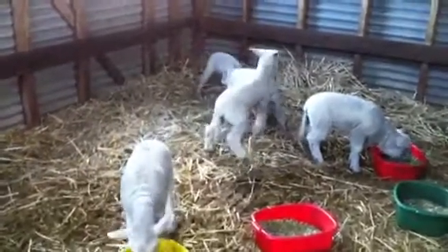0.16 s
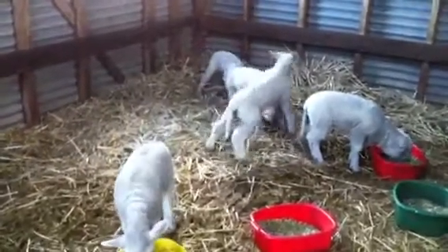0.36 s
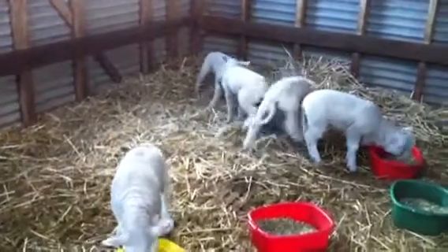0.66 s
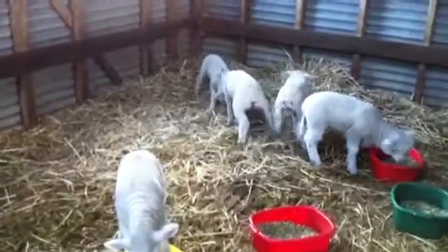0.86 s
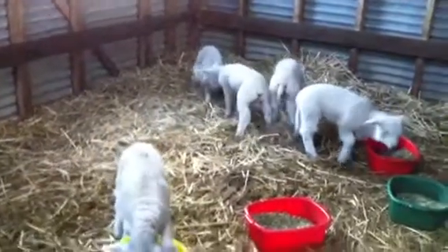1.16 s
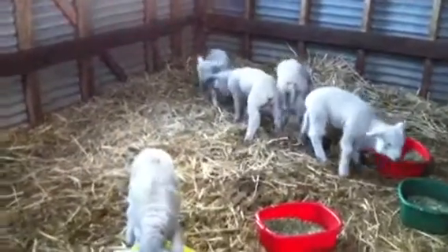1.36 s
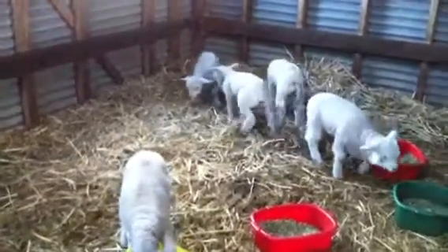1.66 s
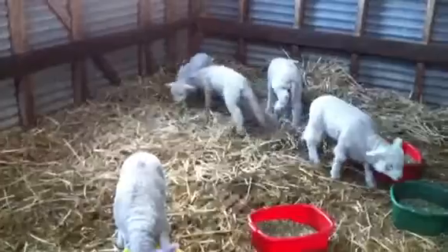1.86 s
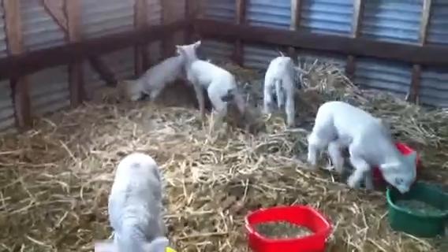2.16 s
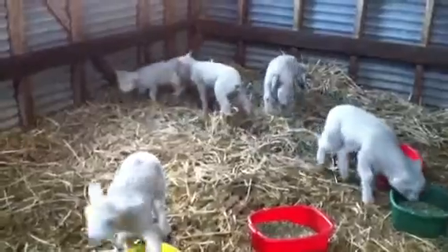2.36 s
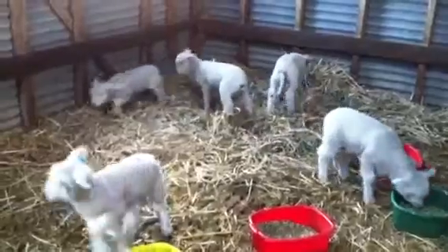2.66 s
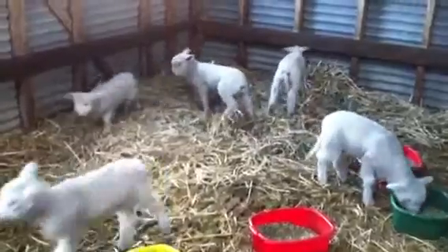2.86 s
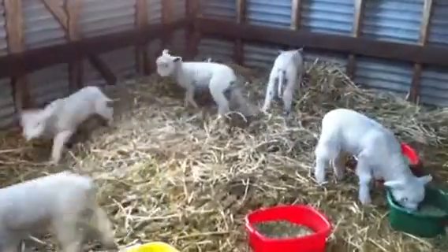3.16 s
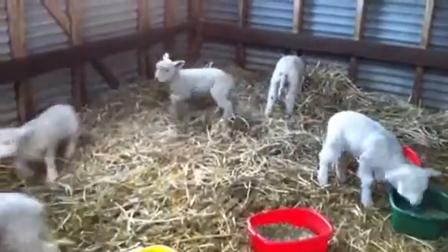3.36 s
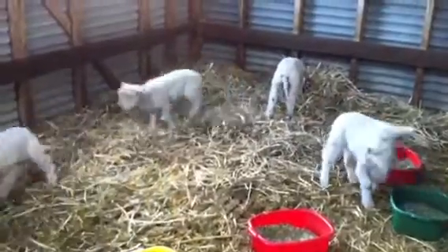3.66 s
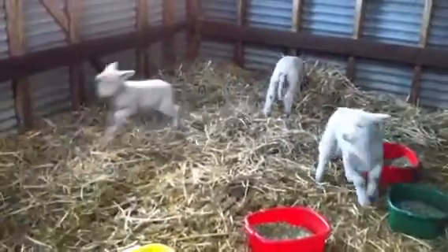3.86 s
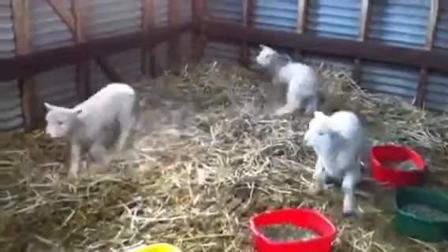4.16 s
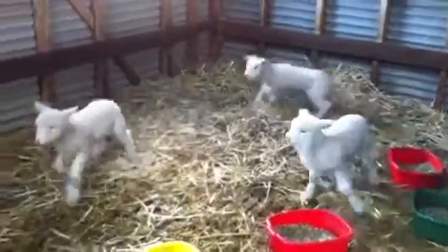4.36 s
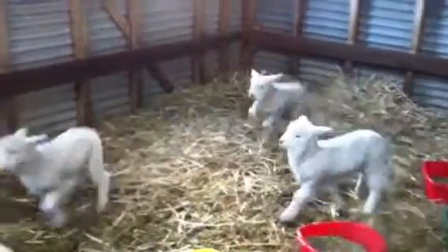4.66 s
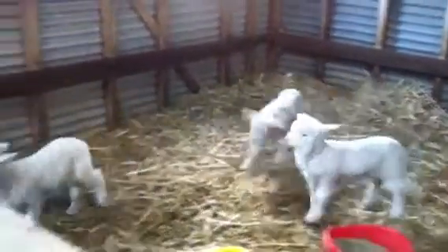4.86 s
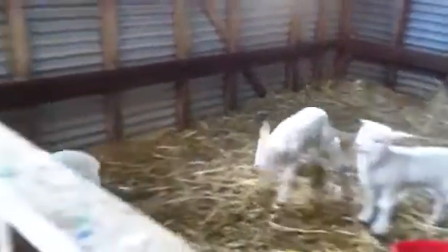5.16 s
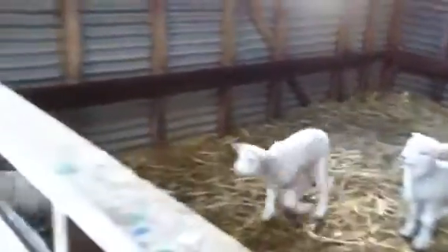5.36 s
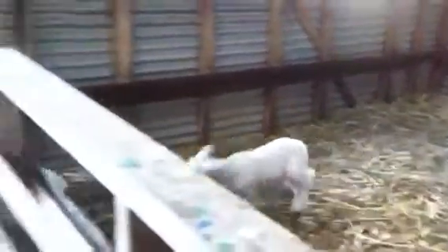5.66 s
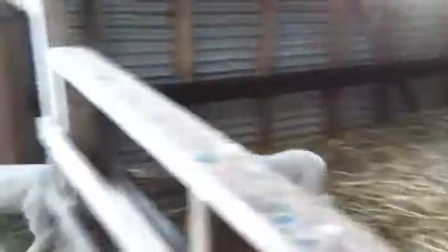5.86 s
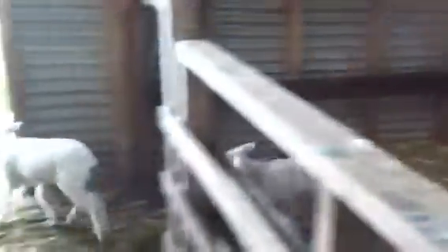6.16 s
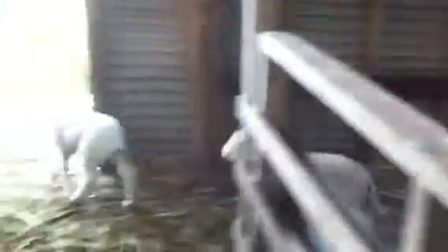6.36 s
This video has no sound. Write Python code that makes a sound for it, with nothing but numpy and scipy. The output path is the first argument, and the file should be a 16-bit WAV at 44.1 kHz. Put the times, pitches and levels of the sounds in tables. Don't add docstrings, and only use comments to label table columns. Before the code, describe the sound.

A quiet shed with soft hiss and a faint low draught on a small, nearly mono microphone. From 0 to 1 s, lambs stir dry straw: short crisp drags, light steps and tiny stalk snaps. At about 1.2 s a firm hoof thump lands with a dull woody knock and small rattle; softer steps follow at 1.35 and 1.65 s. Around 2.0-2.3 s the rustling swells brightly. At 2.6-2.75 s comes the sharpest clatter, a hard hollow knock on board or tub with a bouncing thud. From 3 to 4.8 s straw crackles almost continuously with few light steps. Firm thuds hit near 4.95 and 5.14 s amid strong rustles, then knocks and rattles at 5.4-5.6 s. Movement thins after 5.8 s; a very faint, hoarse distant bleat lasts from about 5.87 to 6.08 s. Sparse ticks and soft steps fade into quiet air by 6.5 s.

```python
import sys
import numpy as np
from scipy import signal
from scipy.fft import rfft, irfft
from scipy.io import wavfile
from scipy.ndimage import uniform_filter1d

SR = 44100
rng = np.random.default_rng(int(sys.argv[2]) if len(sys.argv) > 2 else 0)


def waveform_to_disk(signal):
    frames = np.transpose(np.atleast_2d(signal))
    scaled = np.clip(frames, -1, 1) * 32767
    samples = np.round(scaled).astype(np.int16)
    wavfile.write(sys.argv[1], SR, samples)


def voltage_ratio(level):
    return 10 ** (np.asarray(level, float) / 20)


N = 287958


# freq_hz, density_db
FINE_SPECTRUM = [(1470, -9.5), (2500, -5), (6300, 0), (9000, 1.5), (12000, 5), (14000, 2), (16000, -3)]
# freq_hz, density_db
COARSE_SPECTRUM = [(300, -4), (700, -2), (1200, 1), (2000, 1.5), (3200, -1.5), (4500, -1), (7000, -11.5)]


def straw():
    fine_db, coarse_db = stir()
    fine = evened(colour(snaps(per_s=14000, spread_db=1.5), FINE_SPECTRUM))
    coarse = evened(colour(snaps(per_s=5000, spread_db=3.0), COARSE_SPECTRUM))
    clumps_db = 0.68 * lumps(count=400) + 0.5 * lumps(count=1600)
    coarse_gain = voltage_ratio(coarse_db - 1.0 + 1.76 * lumps(count=1500))
    return voltage_ratio(fine_db + clumps_db) * (fine + coarse_gain * coarse)


# time_s, crackle_db, thick_stalks_db (against the crackle)
SHUFFLE = [(0.0, -59.5, -13), (0.4, -61, -12), (0.8, -56, -16.5), (1.27, -57, -13), (1.45, -54, -26),
           (1.69, -52, -17), (2.05, -44, -17.5), (2.46, -45.5, -11.5), (2.81, -51.5, -12),
           (3.2, -49, -14.5), (3.7, -47, -15.5), (4.2, -45.5, -13), (4.66, -44.5, -14),
           (4.92, -47.5, -16.5), (5.3, -48, -13), (5.78, -52.5, -4), (5.85, -58, -6.5), (6.53, -62.5, -11)]
# height_s, crackle_db, half_length_s
DRAGS = [(0.226, -45, 0.072), (.35, -52, 0.041), (0.468, -51, 0.042), (0.608, -45, 0.094),
         (0.724, -44, 0.047), (0.887, -44, 0.091), (1.082, -43.5, 0.17), (1.447, -47, 0.071),
         (1.618, -48.5, 0.012), (1.856, -48, 0.053), (2.252, -39.5, 0.15), (2.662, -42.5, 0.13),
         (2.903, -46.5, 0.11), (3.01, -48, 0.095), (3.152, -43.5, 0.065), (3.253, -45, 0.019),
         (3.378, -44.5, 0.17), (3.618, -43, 0.053), (3.74, -44, 0.029), (3.866, -43, 0.079),
         (4.145, -45, 0.075), (4.29, -44, 0.028), (4.42, -41.5, 0.21), (4.81, -39.5, 0.062),
         (4.987, -44.5, 0.046), (5.15, -39.5, 0.051), (5.364, -51, 0.035), (5.547, -51, 0.026),
         (5.893, -52.5, 0.016), (6.054, -54, 0.043),
         (.14, -61, .03), (0.454, -50, .02), (0.603, -48, .02), (.92, -47, 0.029), (1.066, -49, .02),
          (1.36, -51, 0.032), (1.5, -53, .02), (1.585, -60, 0.022), (1.78, -52, .02), (2.126, -44, 0.032),
          (2.264, -42.5, 0.027), (2.59, -45, 0.035), (2.88, -56, .02), (3.145, -50, .02), (3.483, -48, .02),
          (3.973, -43.5, .02), (4.05, -48, .02), (4.593, -44, 0.055), (4.66, -47, .02), (4.788, -46, .02),
          (4.978, -41.5, .02), (5.05, -49, 0.026), (5.202, -45.5, 0.025), (5.542, -48, .005),
          (5.646, -54, .02), (5.97, -55, .02), (6.13, -60, .012), (6.172, -53, .025), (6.328, -57, .025),
          (6.5, -54.5, .04)]


def stir():
    base_db, coarse_db = follow(SHUFFLE)
    fine_db = 10 * np.log10(voltage_ratio(2 * base_db) + swells(DRAGS))
    slow_db = uniform_filter1d(fine_db, size=3000)
    return fine_db, coarse_db + slow_db - fine_db


# height_s, peak_db
BREAKS = [(0.0694, -42), (0.1637, -36), (0.1764, -34), (0.2985, -33), (0.4677, -35), (0.5226, -37),
          (0.7191, -31), (0.7355, -32), (0.8151, -33), (1.0382, -30), (1.0616, -27), (1.3543, -36),
          (1.4755, -32), (1.5396, -37), (1.6115, -34), (1.8082, -33), (2.699, -30), (2.9315, -31),
          (3.0022, -33), (3.1434, -28), (3.2436, -28), (3.5797, -26), (3.8035, -32), (3.9107, -32),
          (4.1045, -30), (4.6406, -30), (4.9661, -29), (5.1067, -31), (5.1766, -27), (5.2785, -32),
          (5.313, -37), (5.5376, -26), (5.6271, -37), (5.7022, -33), (5.7437, -38), (5.8849, -38),
          (6.0656, -39), (6.0782, -39), (6.1325, -42), (6.3912, -43)]


def breaks():
    out = np.zeros(N)
    cycles = 1.25
    for (s, peak_db), hz in zip(BREAKS, rng.uniform(12000, 14000, len(BREAKS))):
        add(out, s - cycles / hz, tap(peak_db - 0.6, hz, cycles))
    return out


def hooves():
    return patter() + landings() + blows() + contacts()


# start_s, peak_db, pitch_hz, t60_s, slips_db (against the peak)
THUDS = [(0.145, -42.5, 196, 0.025, -14), (0.373, -41, 169, 0.027, -6.5), (0.812, -43, 268, 0.027, -11),
         (0.851, -51.5, 197.6, 0.24, -7), (1.188, -55, 159, 0.05, 7), (1.227, -37.5, 154, 0.056, -8),
         (1.344, -42.5, 315, 0.038, -3.5), (1.607, -41, 177, 0.027, -27), (1.656, -45.5, 337, 0.027, -2),
         (2.583, -50.5, 268, 0.091, 0), (2.646, -51, 203, 0.11, 1), (2.69, -33, 325, 0.063, 1.5),
         (2.895, -37, 273, 0.018, -4.5), (3.023, -46, 173, 0.062, -3), (4.77, -56, 182, 0.048, 8.5),
         (4.932, -47.5, 374, 0.029, 5), (4.95, -32, 218, 0.031, -20), (5.139, -34, 194, 0.026, -8),
         (5.38, -52, 330, 0.041, 11), (5.419, -45, 243, 0.034, 6), (5.456, -42, 244, 0.035, 5.5),
         (5.481, -51, 358, 0.031, -19), (5.593, -41.5, 219, 0.1, -9), (6.127, -52, 196, 0.037, 4)]
# start_s, peak_db, pitch_hz
MORE_THUDS = [(0.35, -47, 221), (0.621, -49, 150), (0.656, -47, 186), (0.739, -46, 131), (0.775, -45, 193),
              (1.001, -51, 170), (1.136, -53, 207), (1.258, -44, 394), (1.39, -53, 294), (1.774, -48.5, 206),
              (2.31, -52.5, 258), (2.718, -42, 186), (2.749, -48, 188), (2.927, -42.5, 154), (2.984, -44, 210),
              (3.359, -56, 236), (3.652, -49, 169), (4.17, -51.5, 264), (4.369, -50, 314), (4.49, -56, 198),
              (4.555, -45.5, 236), (4.81, -46.5, 169), (4.999, -50, 250), (5.068, -47, 208), (5.513, -45, 233),
              (5.63, -48, 274), (5.741, -52, 158), (5.984, -46.5, 172), (6.03, -49.5, 172), (6.169, -47, 189)]


def landings():
    out = np.zeros(N)
    for s, *fall in THUDS:
        add(out, s, thud(*fall))
    for s, peak_db, hz in MORE_THUDS:
        add(out, s, thud(peak_db, hz, t60=0.043, slips_db=-9))
    return out


def thud(peak_db, hz, t60, slips_db):
    t = np.arange(SR // 4) / SR
    decay = voltage_ratio(-60 * t / np.clip(t60, 0.02, 0.4))
    push = t * decay * np.sin(2 * np.pi * hz * t * (1 - 0.55 * t))
    mutter = ground(slips(t60=0.16), rng.uniform(0.923, 1.22))
    return peaked(push, peak_db - 0.8) + peaked(mutter, peak_db + slips_db)


# start_s, peak_db, pitch_hz, crack_db (against the peak)
KNOCKS = [(0.0, -57, 1068, 9), (0.029, -57.5, 1150, 7), (0.351, -57, 1170, 8.5), (0.654, -47, 546, -9),
          (0.889, -52, 563, -2), (1.196, -47, 706, -4), (1.227, -33.5, 526, -20), (1.238, -42.5, 497, -26),
          (1.344, -42.5, 552, -6), (1.608, -47, 565, -5), (1.659, -47, 516, -11), (1.988, -50, 480, -7),
          (2.581, -35, 614, -0.5), (2.585, -43, 1330, 3), (2.59, -35.5, 910, -12), (2.609, -38.5, 623, -17),
          (2.69, -36, 520, -8), (2.966, -45.5, 1210, -15), (2.98, -46, 555, -11), (4.373, -45, 960, -7),
          (4.478, -42.5, 543, -5), (4.932, -40.5, 423, -10), (5.136, -48.5, 430, 7.5),
          (5.383, -35, 473, -11), (5.399, -35, 775, -11), (5.453, -50, 463, -17), (5.584, -49, 1193, 0),
          (5.64, -54, 815, -5), (5.672, -53, 418, -5), (6.25, -56.5, 610, 3)]
# start_s, peak_db, pitch_hz
NUDGES = [(0.449, -47.5, 654), (0.854, -49, 785), (1.269, -50, 423), (1.309, -51, 553), (1.389, -46, 497),
          (1.945, -50, 480), (2.161, -43.5, 493), (2.198, -54, 563), (2.34, -47, 623), (2.645, -43, 850),
          (2.719, -47, 700), (2.821, -46.5, 536), (2.892, -53, 516), (2.925, -51, 590), (3.657, -50, 553),
          (4.509, -48, 596), (4.767, -50, 654), (4.939, -45, 710), (5.198, -52, 730), (5.328, -48, 655),
          (5.389, -50, 1350), (5.419, -47, 573), (5.439, -43, 470), (5.46, -50, 1050), (5.478, -61, 416),
          (5.5, -51, 795), (5.605, -45.5, 700), (5.63, -49, 880), (6.074, -51.5, 755), (6.198, -48.5, 730)]


def blows():
    out = np.zeros(N)
    for s, peak_db, hz, crack_db in KNOCKS:
        add(out, s, knock(peak_db, hz, crack_db, t60=0.13))
    for s, peak_db, hz in NUDGES:
        add(out, s, knock(peak_db, hz, crack_db=-11, t60=0.18))
    return out


# freq_hz, width_hz, gain_db
BOARD_MODES = [(403, 160, -4), (589, 47, 13), (610, 200, 7), (740, 170, -6), (820, 61, -7)]
# freq_hz, width_hz, gain_db
TUB_MODES = [(1050, 240, 8), (1330, 240, 8.5), (1610, 460, 3.5), (2100, 380, 5), (2840, 1400, -1.5)]


def knock(peak_db, hz, crack_db, t60):
    blow = slips(t60)
    blow[60] += 9.5
    board = ring(blow, hz, 100) + 0.53 * body(blow, BOARD_MODES, rng.uniform(0.704, 1.162))
    board = ring(board, hz, 1000)
    crack = ring(body(slips(1.53 * t60), TUB_MODES), 1630, 1900)
    return peaked(board, peak_db + 0.5) + peaked(crack, peak_db + crack_db - 0.5)


# height_s, peak_db, pitch_hz
BOUNCES = [(0.687, -56, 220), (0.712, -49, 180), (0.779, -54, 298), (0.79, -55, 220), (0.865, -47, 190),
           (0.874, -49, 330), (0.935, -55, 193), (1.218, -57, 180), (1.262, -54, 200), (1.236, -36, 336),
           (1.358, -45, 322), (2.655, -48, 198), (2.696, -45, 328), (2.702, -46, 370), (2.713, -42, 368),
           (2.74, -45, 219), (2.751, -40, 181), (2.76, -49, 370), (2.784, -54, 330), (2.822, -53, 370),
           (2.836, -54, 370), (2.971, -51, 256), (4.36, -54, 370), (4.435, -59, 250), (4.535, -51, 220),
           (4.934, -40, 367), (4.976, -41, 238), (4.834, -51, 370), (5.004, -52, 220), (5.023, -50, 220),
           (5.077, -56, 220), (5.139, -40, 380), (5.153, -56, 370), (5.166, -49, 180), (5.18, -43.5, 171),
           (5.192, -48, 323), (5.457, -50, 270), (5.484, -40, 370), (5.583, -48, 272), (5.605, -54, 200),
           (5.624, -52, 248), (5.63, -47, 370), (5.649, -53, 270), (5.675, -51, 338), (5.747, -54, 173),
           (5.755, -46.5, 222), (6.169, -50, 272), (6.2, -53, 334), (6.213, -48.5, 340)]
# height_s, peak_db, pitch_hz
RATTLES = [(0.364, -53, 1100), (1.242, -57, 610), (1.255, -48, 450), (1.276, -54, 670), (1.292, -54, 744),
           (1.362, -50, 570), (1.614, -49, 1000), (1.967, -54, 1090), (2.134, -51, 1110),
           (2.141, -51, 1230), (2.177, -57, 610), (2.185, -52, 1230), (2.197, -56, 1230), (2.2, -47, 610),
           (2.288, -59, 1360), (2.42, -53, 1010), (2.61, -47, 1230), (2.626, -47, 820), (2.647, -48, 1020),
           (2.661, -47, 820), (2.678, -48, 1230), (2.703, -43, 560), (2.719, -49, 610), (2.73, -48, 610),
           (2.74, -51, 670), (2.853, -50, 725), (2.902, -56, 910), (2.926, -49, 680), (2.966, -47, 1350),
           (2.983, -48, 610), (4.29, -55, 1230), (4.307, -57, 1110), (4.328, -51, 1010), (4.375, -52, 905),
           (4.501, -47, 610), (4.504, -54, 1360), (4.518, -48, 610), (4.769, -51, 1360), (4.769, -48, 820),
           (4.958, -54, 550), (4.988, -55, 490), (5.002, -59, 1360), (5.007, -54, 550), (5.148, -47, 1360),
           (5.164, -51, 820), (5.17, -50, 1230), (5.218, -46, 730), (5.527, -48, 420), (5.39, -42, 428),
           (5.426, -43, 820), (5.433, -50, 550), (5.463, -48, 1010), (5.466, -48, 494), (5.481, -44, 725),
           (5.495, -54, 560), (5.618, -51, 744), (5.648, -55, 1010), (5.763, -55, 1110),
           (1.232, -52, 1900), (1.234, -51, 850), (1.311, -52, 420), (1.332, -54, 570), (2.583, -42, 3300),
          (2.588, -31.5, 1330), (2.594, -41, 2500), (2.595, -36, 960), (2.6, -44, 3600), (2.692, -39, 2100),
          (2.692, -47, 2900), (2.695, -45, 710), (2.709, -46, 457), (2.712, -45, 700), (2.728, -53, 800),
          (2.653, -45, 890), (1.285, -48, 520), (1.296, -55, 430), (5.476, -51, 478), (5.385, -45, 1050),
          (5.395, -46, 1900), (5.399, -47, 2900), (5.407, -47, 2200), (5.417, -49, 1800),
          (5.435, -48, 1200), (5.445, -49, 1500), (5.588, -52, 990), (5.6, -54, 1300), (5.61, -56, 940),
          (5.625, -54, 1197), (5.635, -56, 1600), (5.655, -52, 1300), (5.675, -57, 950)]


def contacts():
    out = np.zeros(N)
    for rows, cycles in (BOUNCES, 1.076), (RATTLES, 1.803):
        for s, peak_db, hz in rows:
            add(out, s - cycles / hz, tap(peak_db, hz, cycles))
    return out


# time_s, level_db
PATTER = [(0.15, -66), (0.62, -58.5), (0.9, -56), (0.97, -66), (1.27, -52), (1.44, -91), (2.07, -70),
          (2.25, -54.5), (2.7, -75), (2.85, -60), (3.47, -60.5), (4.16, -74), (4.29, -55.5), (4.49, -54),
          (5.44, -55), (5.58, -48.5), (5.8, -57), (6.53, -56)]


def patter():
    level_db, = follow(PATTER)
    pushes = ground(snaps(per_s=600, spread_db=4.5))
    return voltage_ratio(level_db - 4.5) * evened(ring(pushes, 290, 500))


# freq_hz, width_hz, gain_db
GROUND_MODES = [(121, 41, -5.5), (155.3, 45, 3), (212, 44, 2), (252, 38, 0.5), (326, 74, -3.5),
                (553, 133, -9.5)]


def ground(x, detune=1):
    return body(x, GROUND_MODES, detune)


# time_s, level_db, fold_rate_hz
CRY = [
    (5.86, -82, 157),
    (5.89, -62.5, 155.5),
    (5.93, -64.5, 153.5),
    (5.97, -71, 154),
    (6.0, -66.5, 165),
    (6.04, -70, 158.5),
    (6.08, -77, 164),
]


def cry():
    level_db, fold_hz = follow(CRY)
    turns = np.cumsum(fold_hz * (1 + 0.006 * lumps(count=350))) / SR
    harmonics = [(12, -8), (13, 0), (14, -13)]  # number, dB
    folds = sum(voltage_ratio(db) * np.cos(2 * np.pi * k * turns) for k, db in harmonics)
    breath = ring(ring(rng.standard_normal(N), 2030, 300), 2030, 300)
    t = np.arange(N) / SR
    sounding = (t > CRY[0][0]) * (t < CRY[-1][0])
    return voltage_ratio(level_db) * evened(folds + 1.5 * breath) * sounding


# freq_hz, t60_s
SHED_DECAY = [(150, 0.33), (500, 0.44), (2000, 0.12), (8000, 0.032), (16000, 0.22)]


def shed(x):
    hz, t, z = signal.stft(rng.standard_normal((3, SR // 3)), SR, nperseg=256)
    decay = voltage_ratio(-60 * t / read(SHED_DECAY, hz)[:, None])
    tails = signal.istft(z * decay, SR, nperseg=256)[1]
    tails[:, :300] = 0
    phase = 2 * np.pi * (np.arange(3)[:, None] / 3 + 2.3 * np.arange(N) / SR)
    shares = np.cos(phase) * np.sqrt(2 / 3)
    tails = tails / np.linalg.norm(tails[0])
    return signal.fftconvolve(x * shares, tails, axes=1)[:, :N].sum(0)


# height_s, level_db
GUSTS = [(.44, -74), (.63, -62), (.85, -67), (1.05, -77), (1.24, -67.5), (1.64, -68), (1.92, -78),
         (2.17, -71), (2.7, -84), (3.6, -71), (3.8, -76), (4.1, -81), (4.46, -73), (4.8, -72), (4.95, -63),
         (5.13, -74), (5.381, -72), (5.56, -63), (5.8, -72), (6.1, -74), (6.4, -81)]


def draught():
    idle_db, half_length_s = -80.5, 0.1
    level = np.sqrt(voltage_ratio(2 * idle_db) + swells([(s, db, half_length_s) for s, db in GUSTS]))
    return level * evened(ring(ring(rng.standard_normal(N), 100, 55), 100, 55))


# freq_hz, density_db
AIR_SPECTRUM = [(12, -6), (22, -7.5), (42, -25), (75, -26), (125, -1), (200, 3), (385, -9.5), (670, -5.5),
                (1300, -8.5), (2400, -9.5), (7000, -8), (11900, -3.5), (14000, -8.5), (16000, -8)]


def quiet_air():
    return voltage_ratio(-54) * evened(colour(rng.standard_normal(N), AIR_SPECTRUM))


def snaps(per_s, spread_db):
    chance, size, sign = rng.random(N), rng.exponential(1, N), rng.choice([-1., 1.], N)
    return (chance < per_s / SR) * sign * voltage_ratio(spread_db * np.minimum(size, 4))


def slips(t60):
    t = np.arange(SR // 4) / SR
    rise = np.minimum(t / 0.00093, 1)
    return rng.standard_normal(len(t)) * voltage_ratio(-60 * t / np.clip(t60, 0.02, 0.6)) * rise


def tap(peak_db, hz, cycles):
    turns = np.arange(round(8 * cycles * SR / hz)) * hz / SR
    swell = turns / cycles * np.exp(1 - turns / cycles)
    return voltage_ratio(peak_db) * swell * np.sin(2 * np.pi * turns)


def ring(x, hz, width):
    r = np.exp(-np.pi * width / SR)
    return 2 * signal.lfilter([1 - r], [1, -r * np.exp(2j * np.pi * hz / SR)], x + 0j).real


def body(x, modes, detune=1):
    return sum((-1) ** k * voltage_ratio(db) * ring(x, hz * detune, width) for k, (hz, width, db) in enumerate(modes))


def swells(rows):
    t = np.arange(0, N + 64, 64) / SR
    fall_db = 7.5
    power = sum(voltage_ratio(2 * (db - fall_db * ((t - s) / half) ** 2)) for s, db, half in rows)
    return np.interp(np.arange(N) / SR, t, power)


def lumps(count):
    return evened(uniform_filter1d(uniform_filter1d(rng.standard_normal(N), count), count))


def colour(x, points):
    return irfft(rfft(x) * voltage_ratio(read(points, np.fft.rfftfreq(len(x), 1 / SR))), len(x))


def read(points, hz):
    f, value = np.transpose(points)
    return np.interp(np.log(hz + 1), np.log(f + 1), value)


def follow(rows):
    s, *columns = np.transpose(rows)
    return [np.interp(np.arange(N) / SR, s, c) for c in columns]


def evened(x):
    return x / np.sqrt(np.mean(x ** 2) + 1e-20)


def peaked(x, db):
    return voltage_ratio(db) * x / abs(x).max()


def add(mix, s, sound):
    part = mix[round(s * SR):][:len(sound)]
    part += sound[:len(part)]


def scene():
    steps, rustle = hooves(), straw() + breaks()
    near = steps + rustle + cry() + shed(voltage_ratio(-13.5) * (steps + rustle))
    no_bass = signal.butter(4, 110, "highpass", fs=SR, output="sos")
    near = signal.sosfilt(no_bass, near)
    return np.tile(near + quiet_air() + draught(), (2, 1))


def low_pass(x):
    return signal.sosfilt(signal.butter(12, 15940, fs=SR, output="sos"), x)


# height_s, bands
SPLITS = [(.018, 1), (.037, 1), (.873, 1), (.896, 1), (1.639, 1), (1.755, 2), (2.127, 2), (2.382, 2),
          (2.986, 2), (3.009, 1), (3.38, 3), (3.404, 3), (3.705, 3), (4.82, 1), (5.261, 1), (6.051, 1),
          (6.515, 1)]
# freq_hz, gain_db
TOP_EDGE = [(15900, 0), (15960, -90)]


def record(dry):
    side, hz = np.zeros(N + 4096), np.fft.rfftfreq(2048, 1 / SR)
    padded, window = np.pad(dry[0], 2048), np.sin(np.pi * np.arange(2048) / 2048)
    for s, bands in SPLITS:
        at = round(s * SR) + 1024
        place = (np.arange(bands) + rng.random(bands)) / bands
        low_hz = np.interp(place, [0, 1], [4200, 14400])[:, None]
        inside = ((hz > low_hz) & (hz < low_hz + 1650)).any(0)
        band = abs(rfft(padded[at:at + 2048])) * inside
        side[at:at + 2048] += window * irfft(band * np.exp(2j * np.pi * rng.random(len(hz))))
    side = voltage_ratio(-3) * side[2048:-2048]
    return low_pass(np.array([colour(x, TOP_EDGE) for x in dry + [side, -side]]))


dry = scene()
out = record(dry)
waveform_to_disk(out)
```